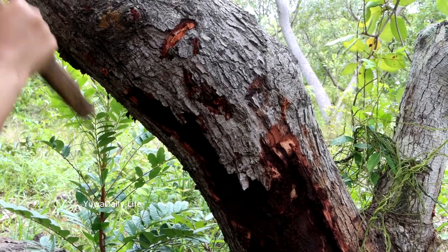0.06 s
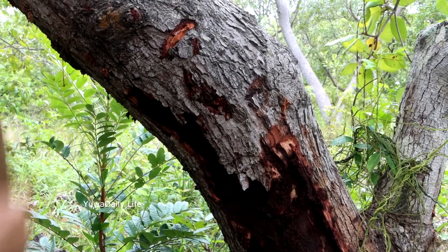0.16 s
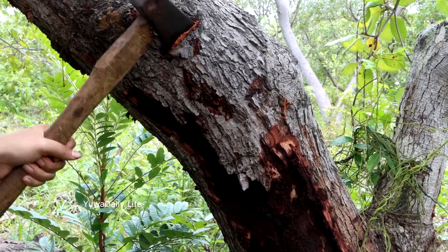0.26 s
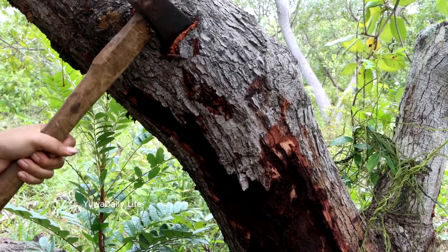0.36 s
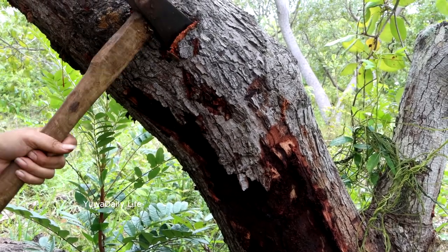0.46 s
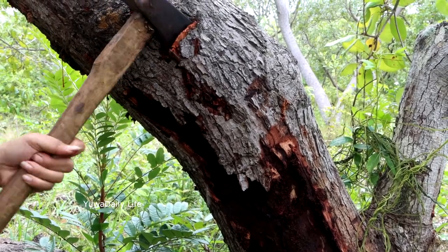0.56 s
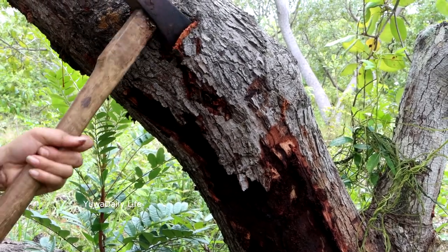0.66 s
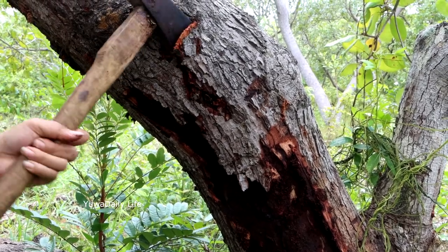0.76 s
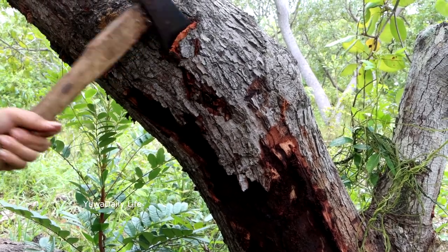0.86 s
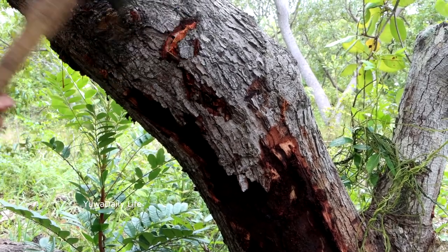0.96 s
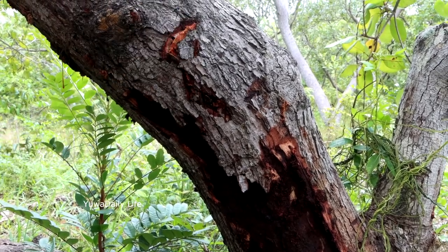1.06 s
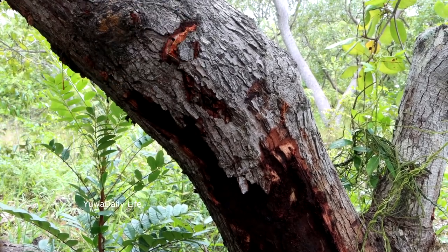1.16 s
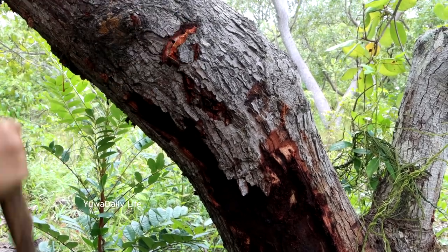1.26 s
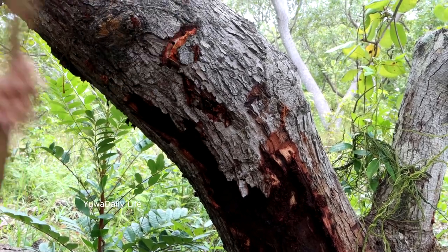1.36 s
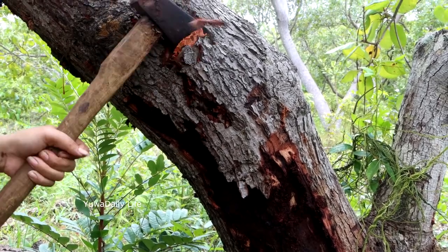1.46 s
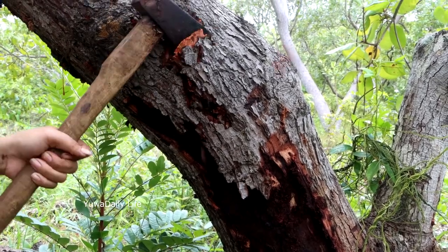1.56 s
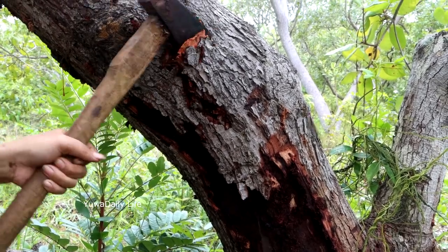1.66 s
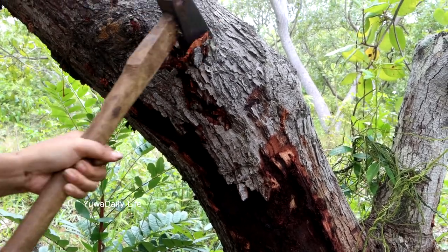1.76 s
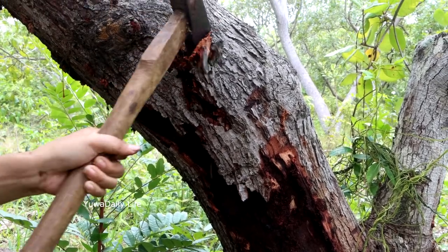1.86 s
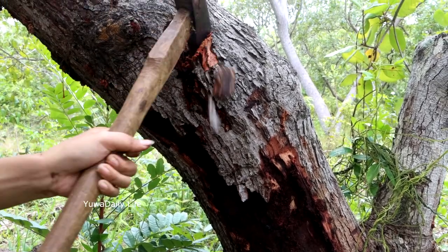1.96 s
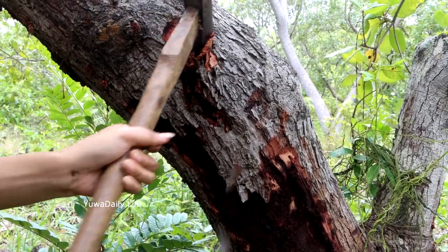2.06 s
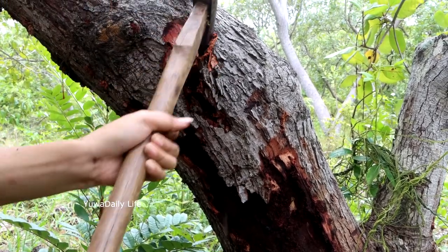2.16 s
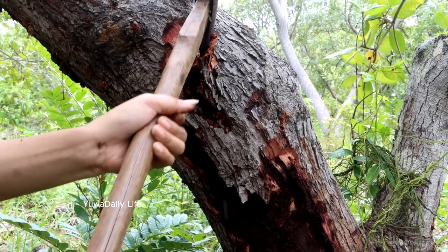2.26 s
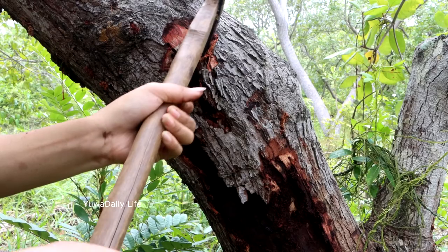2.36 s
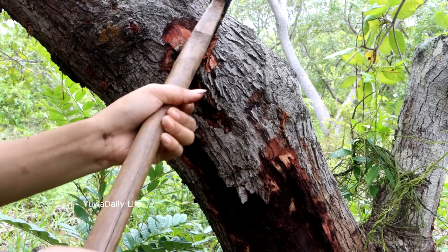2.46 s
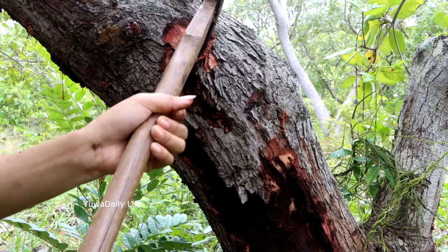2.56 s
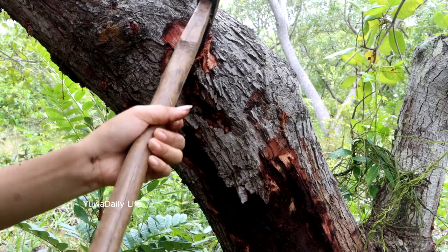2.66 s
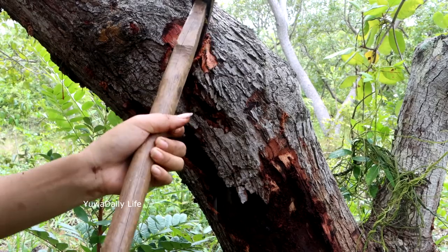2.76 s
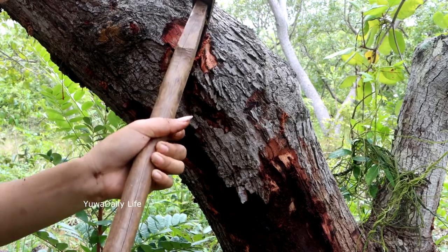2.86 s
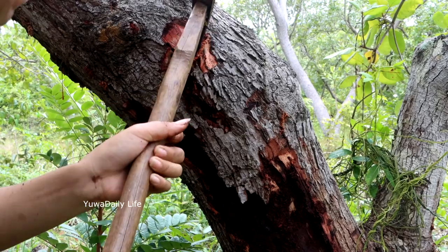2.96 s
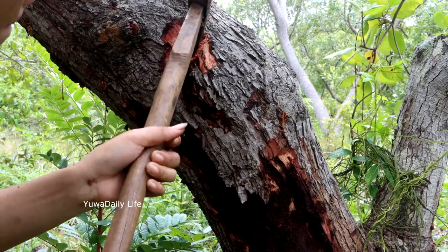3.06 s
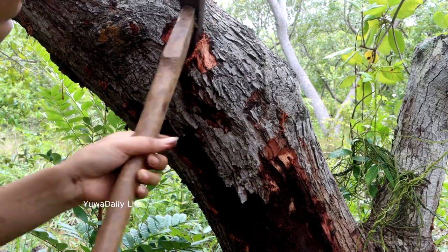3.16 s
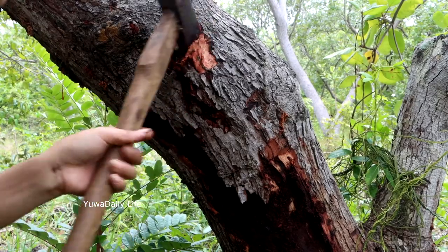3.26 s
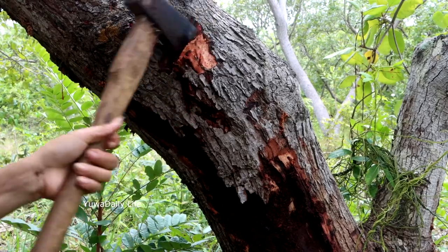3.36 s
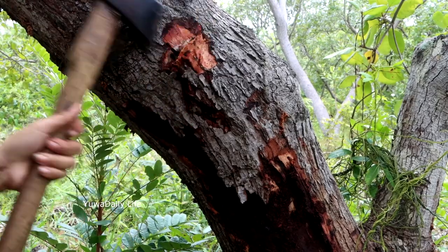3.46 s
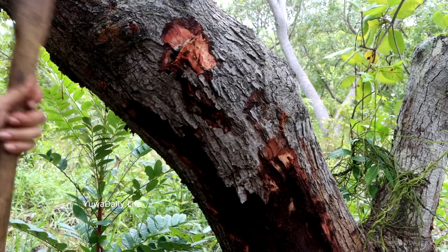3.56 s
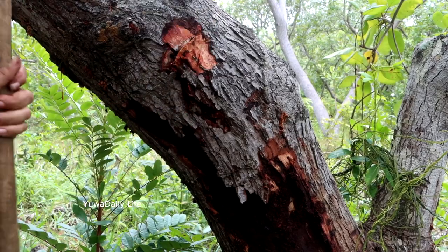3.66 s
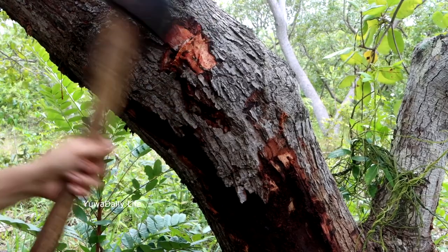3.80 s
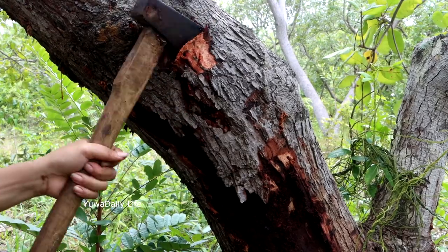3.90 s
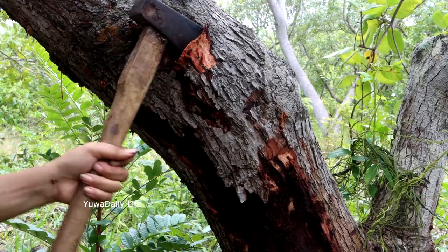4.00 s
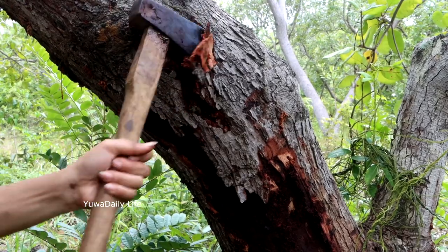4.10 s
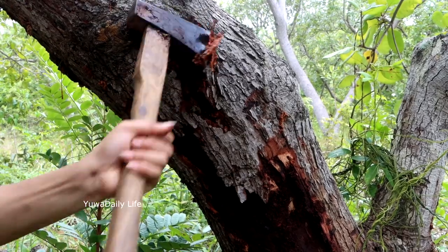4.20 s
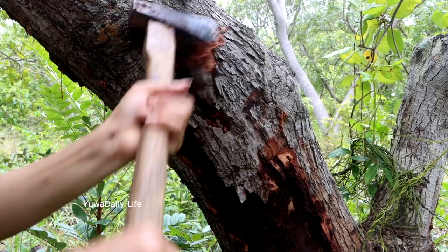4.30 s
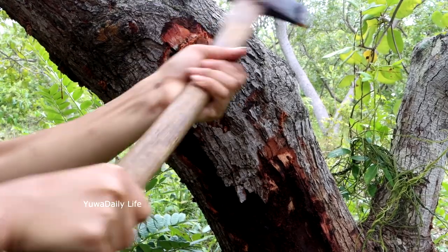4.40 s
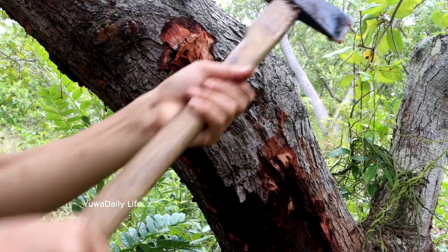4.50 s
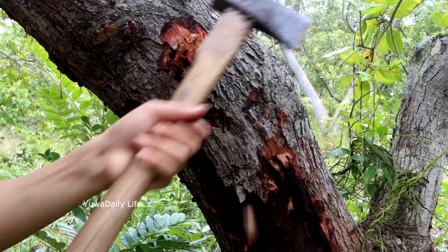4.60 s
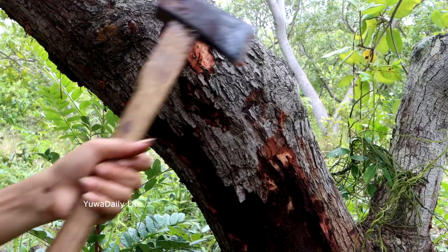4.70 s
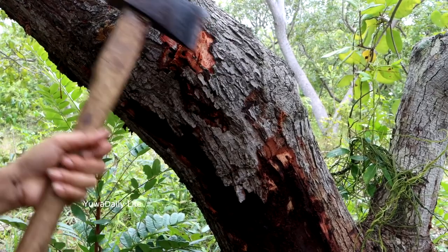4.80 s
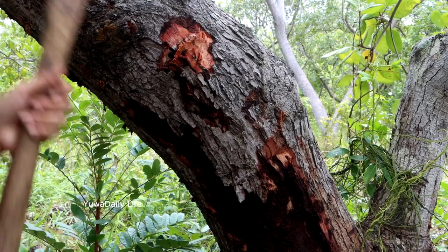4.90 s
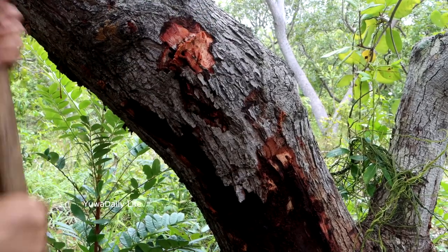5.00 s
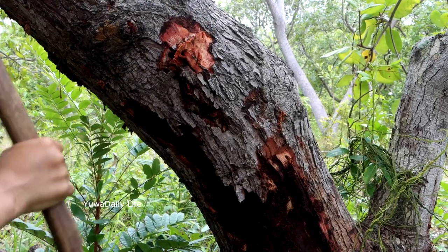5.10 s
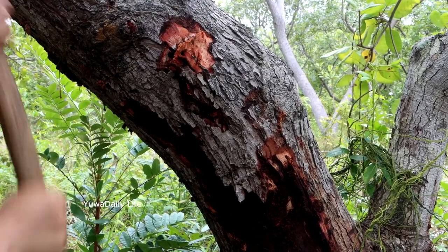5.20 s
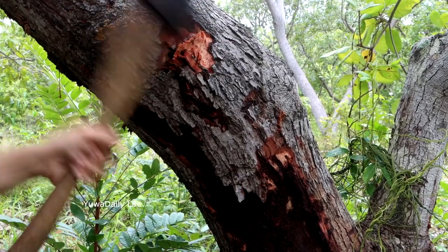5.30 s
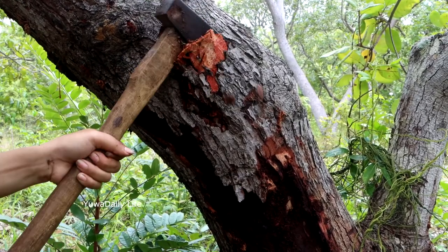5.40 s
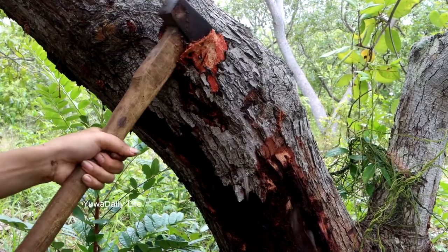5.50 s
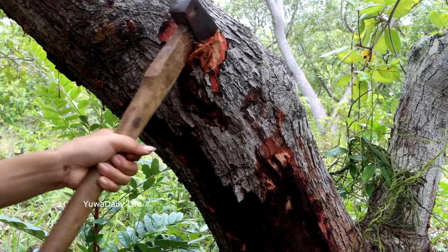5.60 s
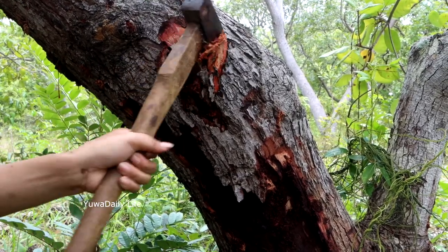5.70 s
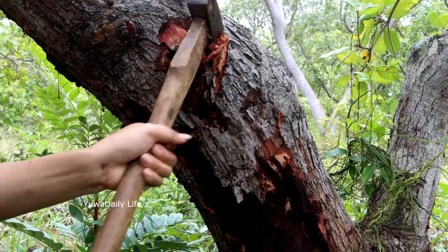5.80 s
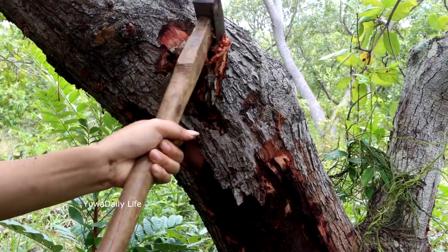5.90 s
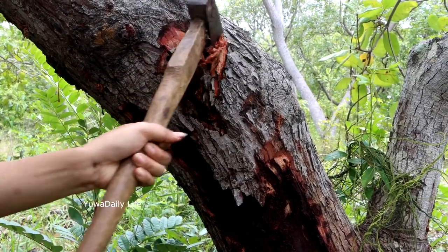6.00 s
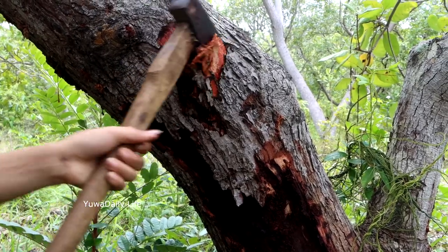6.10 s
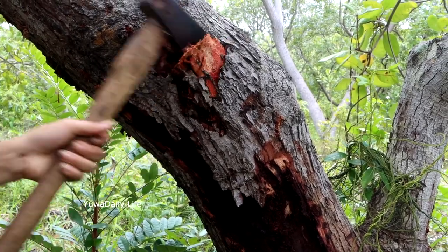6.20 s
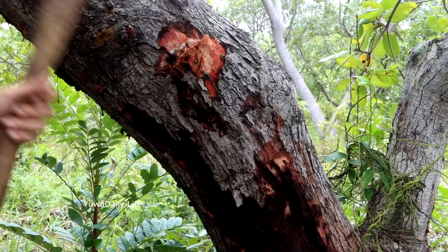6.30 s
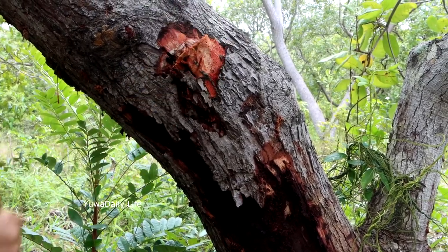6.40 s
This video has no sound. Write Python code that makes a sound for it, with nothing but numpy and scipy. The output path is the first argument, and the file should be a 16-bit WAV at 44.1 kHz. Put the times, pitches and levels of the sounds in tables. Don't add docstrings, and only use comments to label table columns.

```python
import sys
import numpy as np
from scipy import signal
from scipy.fft import rfft, irfft
from scipy.io import wavfile
from scipy.ndimage import uniform_filter1d

SR = 44100
rng = np.random.default_rng(int(sys.argv[2]) if len(sys.argv) > 2 else 0)


def dump(signal):
    limited = np.clip(np.atleast_2d(signal).T, -1, 1)
    pcm = np.round(limited * 32767).astype(np.int16)
    wavfile.write(sys.argv[1], SR, pcm)


def invert_db(x):
    u = np.asarray(x, float) / 20
    return 10 ** u


N = 284445


def level(x, db):
    return x * invert_db(db) / np.sqrt(np.mean(x ** 2))


def colour(x, points):
    hz, db = np.transpose(points)
    log_hz = np.log(np.arange(1025) * SR / 2048 + 1)
    log_gain = np.interp(log_hz, np.log(hz), db) * np.log(10) / 20
    cepstrum = irfft(log_gain)
    cepstrum[1:1024] *= 2
    cepstrum[1025:] = 0
    response = irfft(np.exp(rfft(cepstrum)))
    return signal.fftconvolve(x, response)[:len(x)]


def ring(x, hz, width_hz):
    b, a = signal.iirpeak(hz, hz / width_hz, SR)
    return signal.lfilter(b, a, x)


def body(x, modes):
    return sum((-1) ** k * invert_db(db) * ring(x, hz, width_hz)
               for k, (hz, width_hz, db) in enumerate(modes))


def grains(count, share, spread_db):
    hit = rng.random(count) < share
    return hit * rng.standard_normal(count) * invert_db(spread_db * rng.exponential(size=count))


def add(out, s, x, peak_db):
    i = int(s * SR)
    scaled = x * invert_db(peak_db) / np.abs(x).max()
    out[i:i + len(x)] += scaled[:len(out) - i]


def walk(rate):
    hold = int(SR / rate)
    steps = np.repeat(rng.standard_normal(N // hold + 1), hold)
    return uniform_filter1d(uniform_filter1d(steps, hold), hold)[:N]


# (time [s], peak level [dB], rise [s], bite length [s], fade during the bite [s])
BLOWS = [
    (0.3133, -12, 0.00175, 0.00624, 0.0076),
    (1.4796, -13.5, 0.00071, 0.0196, 0.01235),
    (3.8918, -11.5, 0.0014, 0.00926, 0.0073),
    (5.3877, -23, 0.003, 0.0113, 0.0058),
]
# (fibre breaks against jolts [dB], splinters [dB], thin hiss near 13 kHz [dB], trunk thud
# [dB], after-rattle [dB])
BLOW_LAYERS = [
    (-15, -15, -36, -27, -36),
    (-12, -11, -31, -30, -30),
    (-18, -19, -37, -33, -41),
    (-11, -10, -18, -21, -29),
]
# (time [s], level [dB], favoured pitch [Hz])
EDGE_JOLTS = [(0.3136, -1.3, 800), (0.3148, 5.9, 800), (0.3145, 2.9, 430), (0.3159, -3.0, 4400),
              (0.3164, -6.4, 2700), (0.3177, 6.4, 1500), (0.3184, 0.0, 1500), (0.3196, 2.8, 900),
              (0.3223, -5.4, 2500), (1.48, -0.4, 720), (1.4801, 9.6, 330), (1.4807, -4.5, 4400),
              (1.4817, -1.8, 1900), (1.4832, 1.4, 2400), (1.4849, 2.6, 1300), (1.4868, -5.7, 3300),
              (1.4891, -5.8, 4400), (1.4895, -2.0, 850), (1.4912, -16.0, 2500), (1.493, -8.5, 4400),
              (1.4945, -7.3, 3200), (1.4972, -19.1, 2500), (1.4972, -6.4, 900), (1.5025, -11.5, 800),
              (3.8922, -1.2, 1270), (3.893, 3.0, 1270), (3.8927, -8.0, 430), (3.8932, -5.6, 3400),
              (3.8958, -6.5, 4300), (3.8983, -3.9, 3500), (3.8964, -20.5, 6500), (3.8976, -6.0, 800),
              (3.899, -8.3, 500), (3.9015, -6.3, 4400), (5.3887, -7.4, 2500), (5.3894, -4.0, 480),
              (5.3906, 5.2, 4400), (5.3919, 0.2, 2600), (5.3924, 6.5, 4400), (5.3943, -0.9, 2600),
              (5.3933, -4.7, 900), (5.396, 3.4, 2700), (5.397, -16.5, 700), (5.3991, -1.6, 4400),
              (5.3993, -7.9, 2600), (5.4031, -1.0, 4400)]
# (pitch [Hz], width [Hz], level [dB])
BODY_1 = [(275, 91, -13.4), (481, 93, 5.2), (811, 433, -1.1), (1252, 192, 2.0), (1637, 240, -2.9),
          (2499, 156, -0.7), (3403, 240, -4.7), (4564, 360, -1.0), (5583, 240, -4.0), (6911, 565, -15.0)]
BODY_2 = [(296, 68, -10.8), (606, 156, -1.1), (892, 148, -4.0), (1211, 120, -0.4), (1867, 166, -4.1),
          (2514, 204, 0.3), (3330, 180, 0.5), (4434, 322, 3.0), (5262, 180, -22.5), (6362, 216, -6.0)]
BODY_3 = [(230, 90, -0.0), (457, 132, 2.6), (638, 150, -16.0), (838, 78, 0.9), (1283, 156, 4.2),
          (2432, 210, -5.6), (3307, 180, 2.0), (4371, 216, 1.6), (5420, 264, -12.0), (6502, 150, -4.5)]
BODY_4 = [(318, 94, 9.1), (395, 236, 1.0), (664, 427, -17.3), (843, 120, -4.5), (1538, 246, -13.1),
          (1993, 158, -16.0), (2598, 218, -8.8), (3496, 174, -15.2), (4455, 372, -8.7), (5344, 300, -25.0),
          (6806, 264, -18.3)]
# (pitch [Hz]), then (level against the thud [dB])
BOUGH_HZ = (292, 290, 255, 290)
BOUGH_DB = (11, -9, 8, 9)
# (frequency [Hz], density [dB per Hz])
SPLINTER_COLOUR = [(120, -36), (200, -8.5), (1380, -6.5), (2130, -3), (3340, -0.5), (3890, -16), (4450, -1),
                   (5920, -20.5), (6430, -14.5), (6880, -19), (11000, -34), (14300, -65), (22000, -120)]
# (frequency [Hz], density [dB per Hz])
RATTLE_COLOUR = [(120, -30.5), (200, -5), (815, -5), (1010, -9), (1880, -13.5), (2130, -9), (4030, -7.5),
                 (4490, -7.5), (7510, -18.5), (14000, -31)]


def edge_push(t, s):
    contact_s, spread = 0.00012, 1.1
    push = np.zeros(len(t))
    for at, db, hz in EDGE_JOLTS:
        if 0 <= at - s < .1:
            contact = np.exp(-8 * ((t + s - at) / contact_s) ** 2)
            push -= invert_db(db) * ring(contact, hz, spread * hz)
    return push


def trunk_thud(t, bough_hz, bough_db):
    thud_hz, thud_t60_s, bough_t60_s = 198.8, 0.0778, .05
    thud = np.sin(2 * np.pi * thud_hz * t) * (1 - np.exp(-t / 0.0027)) * invert_db(-60 * t / thud_t60_s)
    bough = np.sin(2 * np.pi * bough_hz * t) * (1 - np.exp(-t / 0.00188))
    return thud + bough * invert_db(bough_db - 60 * t / bough_t60_s)


def after_rattle(t, bite):
    slow_t60_s, quick_t60_s, quick_db = 0.1624, 0.0646, 12.5
    tail = invert_db(-60 * t / slow_t60_s) + invert_db(quick_db - 60 * t / quick_t60_s)
    debris = level(colour(grains(len(t), .25, 1.96), RATTLE_COLOUR), 0)
    return debris * tail * np.clip(t / bite, 0, 1)


def blows():
    out, t = np.zeros(N), np.arange(SR // 3) / SR
    let_go_s, bark_width_hz = 0.0019, 90
    bodies = (BODY_1, BODY_2, BODY_3, BODY_4)
    for row, layers, bough_hz, bough_db, modes in zip(BLOWS, BLOW_LAYERS, BOUGH_HZ, BOUGH_DB, bodies):
        s, db, rise, bite, fade = row
        breaks_db, splinter_db, air_db, thud_db, rattle_db = layers
        release = np.exp(-t / fade - np.clip(t - bite, 0, 1) / let_go_s)
        force = np.clip(t / rise, 0, 1) ** 2 * release
        breaks = force * grains(len(t), .3, 1.37)
        damped = [(hz, max(width_hz, bark_width_hz), g) for hz, width_hz, g in modes]
        hit = level(body(edge_push(t, s), damped), 0)
        hit += level(body(uniform_filter1d(breaks, size=4), damped), breaks_db)
        hit += level(colour(breaks, SPLINTER_COLOUR), splinter_db)
        mix = hit / np.abs(hit).max()
        mix += invert_db(air_db + 10) * force * ring(rng.standard_normal(len(t)), 13260, 3500)
        mix += invert_db(thud_db) * trunk_thud(t, bough_hz, bough_db)
        mix += invert_db(rattle_db) * after_rattle(t, bite)
        add(out, s, mix, db)
    return signal.sosfilt(signal.butter(2, 100, "high", fs=SR, output="sos"), out)


# (time [s], peak level [dB], pitch [Hz], length [s])
BARK_CRACKS = [(0.023, -45.5, 3230, 0.00178), (0.0783, -44.5, 1557, 0.00193),
               (0.7034, -44.5, 2600, 0.00275), (.8105, -40, 2800, 0.00232), (0.8645, -45, 2800, 0.0021),
               (1.78, -42, 1546, 0.0031), (1.9614, -42.5, 2710, 0.0025), (1.9967, -40, 2850, 0.00575),
               (2.028, -41.5, 2720, .0026), (2.042, -33, 2800, 0.00593), (2.0562, -46, 2790, 0.0029),
               (2.1172, -37.5, 3570, 0.00224), (2.1945, -40, 3850, 0.00196), (2.235, -41.5, 3500, 0.0029),
               (2.6898, -39, 4360, 0.00244), (4.3926, -42.5, 1430, .0045), (4.8976, -36, 3350, 0.00179),
               (4.9472, -40.5, 2800, 0.0023), (5.134, -44.5, 2490, 0.004), (5.7617, -44, 1470, 0.00145),
               (5.884, -43, 2210, 0.0032), (5.903, -42, 3620, 0.0043), (5.973, -37, 4220, 0.00118),
               (5.994, -44.5, 4030, 0.00135), (6.0736, -36.5, 2840, 0.0047), (6.0828, -42, 1694, 0.0046),
               (6.0923, -42, 3500, 0.0031), (6.117, -43, 3370, 0.0063), (6.327, -41.5, 3350, 0.003),
               (6.3341, -41.5, 2920, 0.0029)]
# (time [s], peak level [dB], pitch [Hz])
FLAKES = [(.627, -51, 1470), (.662, -53, 1790), (0.7, -50.5, 1500), (.715, -52, 2800), (0.817, -49.5, 2800),
          (1.118, -52, 3500), (.9385, -51, 3600), (1.012, -49, 5600), (1.1882, -48, 3560),
          (1.717, -47.5, 3190), (1.838, -47.5, 2070), (1.928, -51.5, 1920), (2.145, -45.5, 1810),
          (2.3158, -49.5, 3490), (2.462, -52, 2800), (2.576, -45, 2870), (2.984, -52.5, 4100),
          (3.297, -49.5, 3570), (3.3371, -51.5, 3530), (3.4017, -47, 3500), (4.1295, -49.5, 3280),
          (4.3132, -51.5, 2260), (4.3835, -51.5, 2200), (4.913, -46.5, 3450), (4.9308, -48.5, 1950),
          (5.0009, -48, 2990), (5.2052, -51.5, 4900), (5.7848, -51, 2590), (5.8745, -46.5, 1700),
          (6.1793, -49.5, 2180)]
# (pitch [Hz], width [Hz], level [dB])
BARK_MODES = [(789, 350, 0.5), (1500, 380, 2), (2800, 980, 1), (3525, 1370, 0.5), (5260, 2170, -4),
              (7500, 5000, -14)]


def cracks():
    out, t = np.zeros(N), np.arange(SR // 20) / SR
    flake_s = 0.00234
    for s, db, hz, length in BARK_CRACKS + [(*row, flake_s) for row in FLAKES]:
        snaps = grains(len(t), .15, 3.69) * np.exp(-t / length)
        snaps[0] = 2.42
        splinter = ring(ring(snaps, hz, 0.586 * hz), hz, 1.11 * hz)
        bark = body(snaps, BARK_MODES[1:])
        add(out, s, splinter + invert_db(-18.5) * bark, db)
    return out


def soft_knocks(table, push, grit_db):
    out, t = np.zeros(N), np.arange(SR // 4) / SR
    for s, db, hz, t60 in table:
        fade = np.exp(-np.log(1000) * t / t60) * (1 - np.exp(-t * hz / push))
        grit = level(ring(grains(len(t), .05, 2.6), hz, 0.514 * hz), grit_db)
        add(out, s, (np.sin(2 * np.pi * hz * t) + grit) * fade, db)
    return out


# (time [s], peak level [dB], pitch [Hz], t60 [s])
HOLLOW_KNOCKS = [(0.077, -47.5, 852, 0.0136), (0.63, -32, 608.5, 0.0124), (.631, -43, 360, .016),
                 (.6305, -42, 1200, .012), (6.29, -61, 300, .05), (5.77, -58, 260, .05),
                 (.703, -48, 400, .018), (5.785, -58, 820, .03), (0.649, -43, 824, 0.024),
                 (0.666, -38, 848, 0.0253), (0.703, -45.5, 612, 0.023), (0.79, -53, 1070, 0.017),
                 (0.809, -47.5, 870, 0.0155), (1.776, -45.5, 800, 0.0198), (1.929, -54, 835, 0.031),
                 (1.96, -32.5, 820.2, 0.0347), (1.998, -42.5, 836, 0.0315), (2.043, -35, 857, 0.022),
                 (2.059, -51.5, 827, 0.0335), (2.141, -48, 803, 0.04), (2.193, -50, 870, 0.0317),
                 (2.223, -55, 787, 0.0325), (3.482, -48, 1301, 0.034), (4.274, -54, 624.7, 0.023),
                 (4.391, -49.5, 1500, 0.0456), (4.895, -51, 1200, 0.012), (5.762, -58, 1480, 0.03),
                 (5.883, -43, 770, 0.02), (6.083, -51, 829, 0.03), (6.118, -55.5, 870, 0.029),
                 (6.327, -50, 802, 0.046)]


def bark_knocks():
    return ring(soft_knocks(HOLLOW_KNOCKS, 0.845, -8), 854, 2600)


# (time [s], peak level [dB], pitch [Hz], width [Hz], swell [s], stop [s])
STEEL_DRAGS = [
    (4.365, -43, 1010, 1500, 0.033, 0.0038),
    (3.478, -52.5, 1196, 394, 0.0225, 0.0052),
    (6.31, -41, 2650, 4040, 0.0243, 0.0087),
    (2.33, -49.5, 2900, 2420, 0.1422, 0.0316),
    (5.4, -48, 4300, 5000, 0.012, .005),
    (4.926, -46, 6000, 6000, .006, .003),
    (1.926, -51, 4000, 6000, .003, .005),
]


def scrapes():
    out, t = np.zeros(N), np.arange(SR // 3) / SR
    for s, db, hz, width_hz, swell, stop in STEEL_DRAGS:
        drag = np.clip(t / swell, 0, 1) * np.exp(-np.clip(t - swell, 0, 1) / stop)
        grit = drag * grains(len(t), .2, 2.445)
        add(out, s, ring(ring(grit, hz, width_hz), hz, 2 * width_hz), db)
    return out


# (time [s], peak level [dB], pitch [Hz], width [Hz])
SPLINTER_TICKS = [(4.848, -44, 2660, 3800), (4.888, -54.5, 5800, 2500), (5.0445, -55.5, 5800, 3050),
                  (5.094, -54.5, 3100, 4000), (5.1405, -50.5, 3240, 2050), (4.5475, -56, 3740, 1400),
                  (4.570, -57, 5600, 3000), (4.652, -56.5, 3600, 1940), (5.3, -52.5, 4500, 4800),
                  (3.307, -56.5, 5800, 3700), (5.631, -51, 11200, 5600), (5.763, -49, 12500, 6900),
                  (5.984, -46, 12500, 5500), (5.971, -47, 8340, 2000), (6.003, -51, 3600, 2900),
                  (6.309, -50, 5100, 1460), (6.384, -52.5, 2930, 1100), (6.412, -54, 4700, 5000),
                  (5.6985, -52, 1400, 1200), (5.727, -53, 5000, 3000), (5.937, -51, 5000, 6000),
                  (6.051, -52, 3500, 4000), (5.84, -53, 3000, 4000), (2.176, -53, 10000, 5000),
                  (1.757, -53, 4000, 5000), (1.879, -55, 13600, 3900), (2.308, -53, 6000, 6000),
                  (0.68, -54.5, 2550, 4000), (.780, -56.5, 2730, 780), (4.19, -55, 12800, 5400)]
# (time [s], peak level [dB], pitch [Hz])
FURTHER_TICKS = [(1.5404, -51, 3190), (1.8103, -49, 2770), (1.8692, -51, 1500), (2.0654, -51, 2930),
                 (2.1534, -46, 3060), (2.1664, -49, 3310), (2.2712, -52, 3180), (2.3077, -45, 3490),
                 (2.395, -50, 2720), (2.4319, -48, 3220), (2.4544, -47, 2770), (2.4854, -48, 3560),
                 (4.8124, -56, 1670), (4.8254, -48, 4000), (4.8723, -43, 2740), (4.9664, -53, 5260),
                 (5.0114, -56, 1570), (5.0649, -54, 3010), (5.1914, -51, 4940), (5.2404, -57, 2310),
                 (5.7904, -51, 3400), (5.8351, -50, 3400), (5.8674, -43, 2610), (5.9334, -48, 3380),
                 (6.0064, -50, 4650), (6.0194, -57, 3310), (6.1474, -53, 4950), (6.1844, -52, 1750),
                 (6.2522, -52, 2800), (6.2674, -55, 2940), (6.3514, -48, 2580), (6.3654, -51, 3200),
                 (6.4204, -54, 1680), (6.4354, -52, 3750)]


def ticks():
    out, snap = np.zeros(N), signal.unit_impulse(SR // 100)
    further = [(s, db, hz, .8 * hz) for s, db, hz in FURTHER_TICKS]
    for s, db, hz, width_hz in SPLINTER_TICKS + further:
        add(out, s, ring(ring(snap, hz, width_hz), hz, width_hz), db)
    return out


# (time [s], peak level [dB], time to swell 10 dB [s], time to fade 10 dB [s])
LEVER_STROKES = [(.005, -60.5, -1.33, 0.123), (.79, -67, .25, .35), (2.1, -60.5, 0.3849, 0.31),
                 (2.47, -61.5, 0.4658, 0.0927), (2.7, -66.5, 0.38, 0.06), (3.0, -71, .4, .45),
                 (3.52, -69.5, -0.02, -0.14), (4.385, -66.5, 0.012, 0.0349), (4.55, -69, 0.17, 0.18),
                 (4.93, -64.5, 0.2449, 0.2253), (5.89, -63, 0.2427, 0.13), (6.1, -63, 0.1377, 0.1),
                 (6.335, -62.5, 0.12, 0.2)]


def crumble():
    t = np.arange(N) / SR
    power = invert_db(2 * -80)
    for s, db, swell, fade in LEVER_STROKES:
        slope = np.maximum((s - t) / swell, (t - s) / fade)
        power = power + invert_db(2 * db - 20 * slope)
    flurry_db = 2.2 * walk(70)
    dust = np.zeros(N)
    for hz, width_hz, db in BARK_MODES:
        flakes = ring(ring(grains(N, .028, 2.3), hz, width_hz), hz, 2 * width_hz)
        dust += invert_db(db + 2.82 * walk(50)) * flakes
    return level(dust, -1.6) * np.sqrt(power) * invert_db(flurry_db)


# (time [s], peak level [dB], pitch [Hz], t60 [s])
CHIP_THUMPS = [
    (0.924, -61, 118, 0.113),
    (0.974, -58.5, 62.1, 0.084),
    (1.678, -61.5, 79, 0.047),
    (2.109, -54, 109.5, 0.062),
    (2.217, -62, 125.6, 0.247),
    (3.659, -70, 93.4, 0.092),
    (5.609, -63, 78.3, 0.088),
]


def chip_thumps():
    return soft_knocks(CHIP_THUMPS, 0.45, -17.5)


# (frequency [Hz], density [dB per Hz])
LEAF_COLOUR = [(15, -36), (25, 0), (108, 2), (784, 1), (1920, -5), (3580, -9), (4220, -11), (10600, -14),
               (14300, -14), (16400, -21)]
# (frequency [Hz], density [dB per Hz])
LEAF_WIDTH_COLOUR = [(15, -32), (25, -4), (666, -10), (806, -10), (1150, -12.5), (2080, -13), (3130, -13.5),
                     (4700, -14), (13500, -10.5), (15100, -11.5), (16400, -29.5)]


def woodland():
    breeze = invert_db(walk(1.77))
    mid = level(colour(rng.standard_normal(N), LEAF_COLOUR) * breeze, -68.5)
    side = level(colour(rng.standard_normal(N), LEAF_WIDTH_COLOUR), -77.5)
    return mid + side * np.array([[1], [-1]])


def scene():
    trunk = blows() + cracks() + bark_knocks() + scrapes() + ticks() + crumble() + chip_thumps()
    scatter = invert_db(-29) * ring(trunk, 1500, 2500)
    return trunk + scatter * np.array([[1], [-1]]) + woodland()


def band_limit(x):
    return signal.sosfilt(signal.butter(12, 16520, fs=SR, output="sos"), x)


def record(dry):
    top_hz = 15750
    mix = signal.sosfilt(signal.ellip(8, .2, 50, top_hz, fs=SR, output="sos"), dry)
    return band_limit(mix)


dry = scene()
out = record(dry)
dump(out)
```